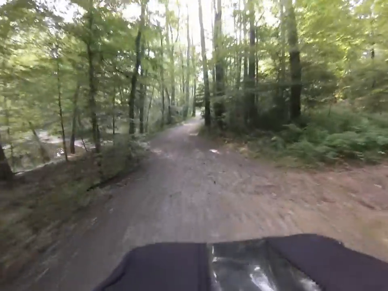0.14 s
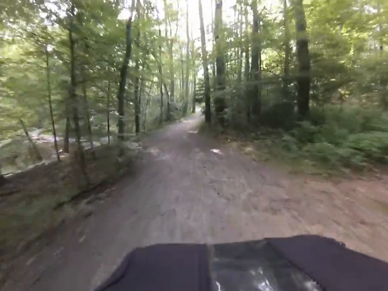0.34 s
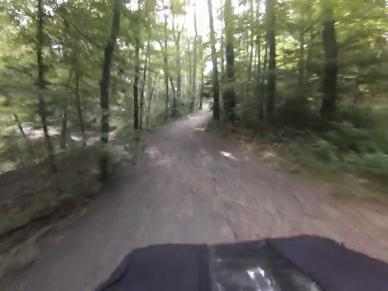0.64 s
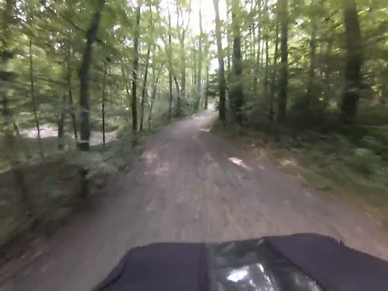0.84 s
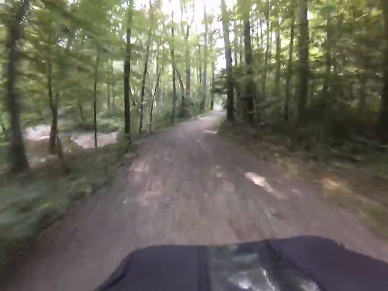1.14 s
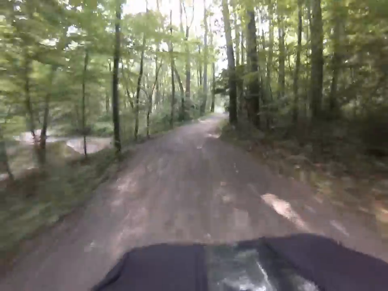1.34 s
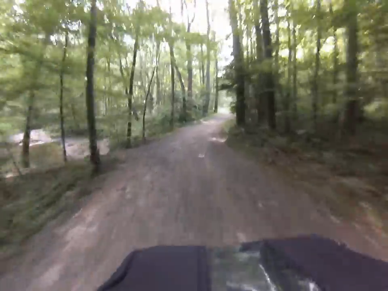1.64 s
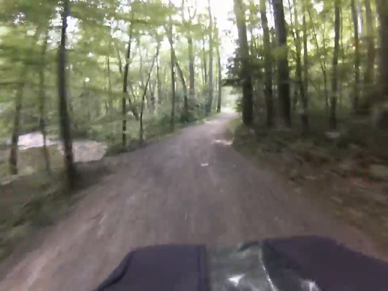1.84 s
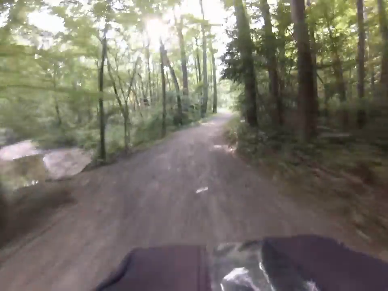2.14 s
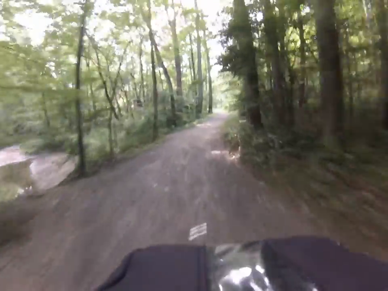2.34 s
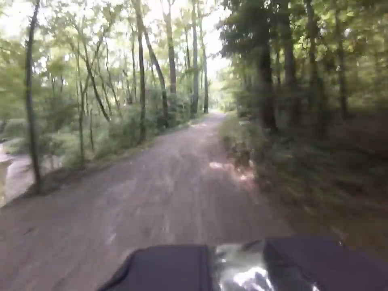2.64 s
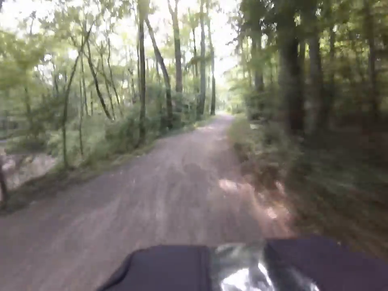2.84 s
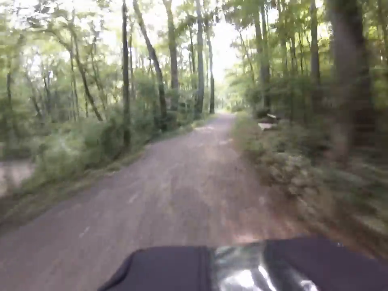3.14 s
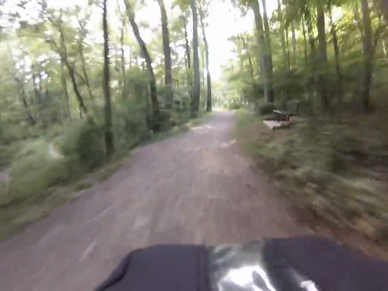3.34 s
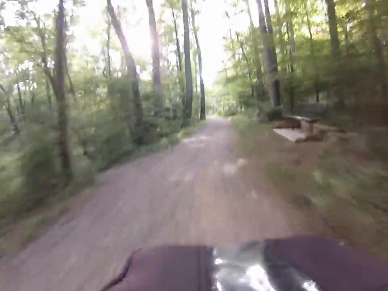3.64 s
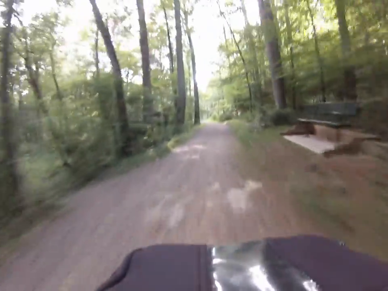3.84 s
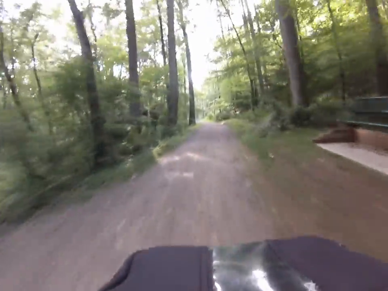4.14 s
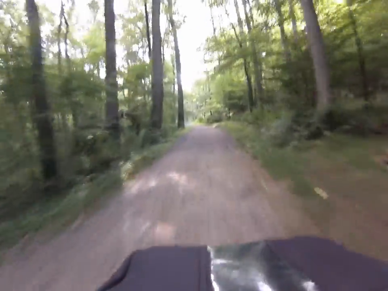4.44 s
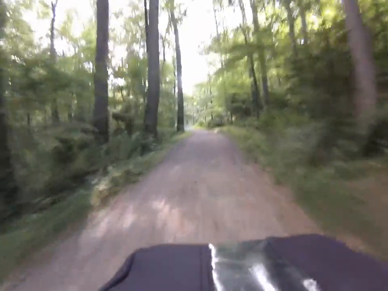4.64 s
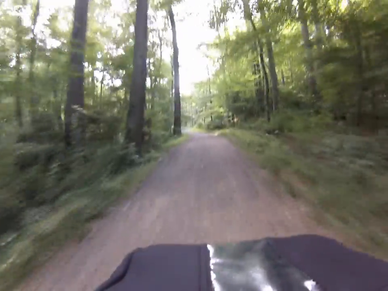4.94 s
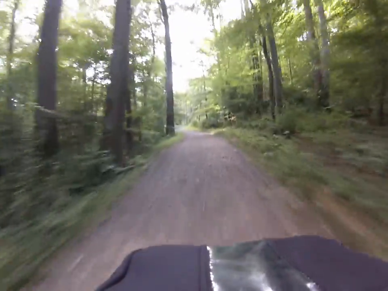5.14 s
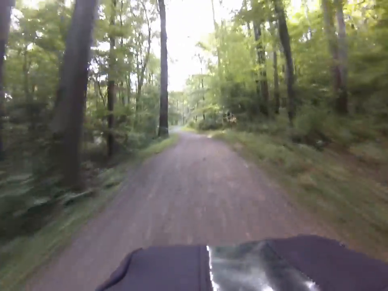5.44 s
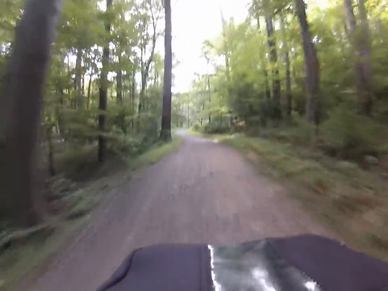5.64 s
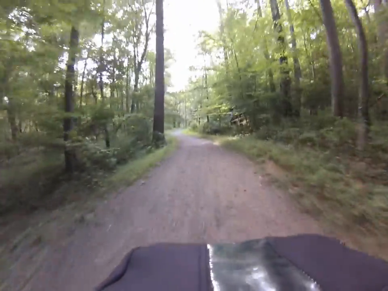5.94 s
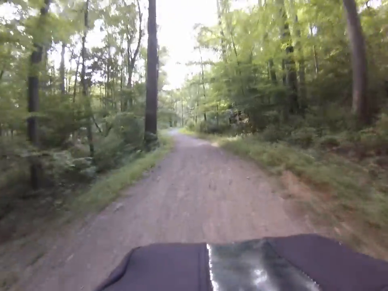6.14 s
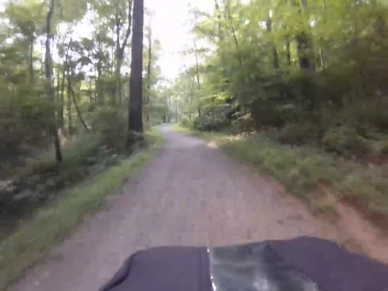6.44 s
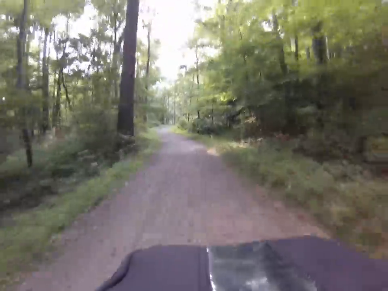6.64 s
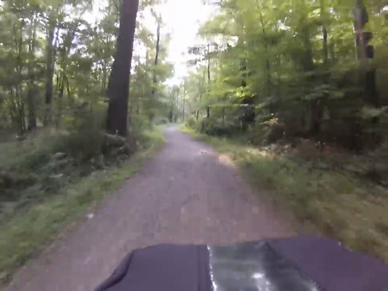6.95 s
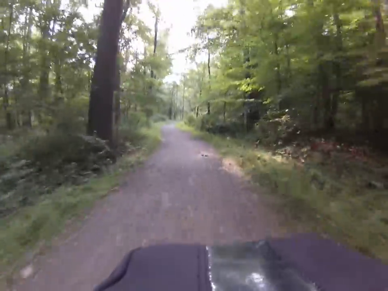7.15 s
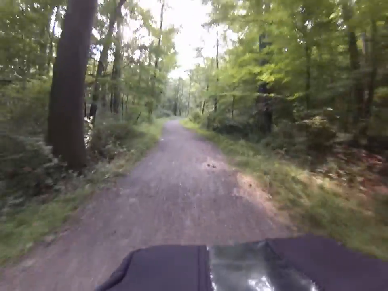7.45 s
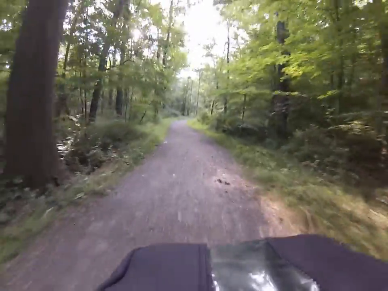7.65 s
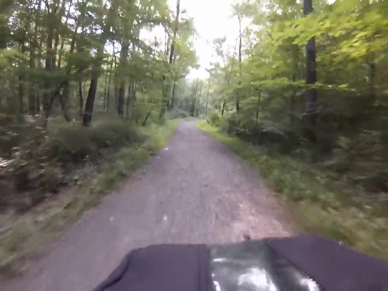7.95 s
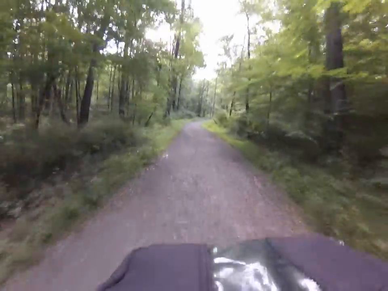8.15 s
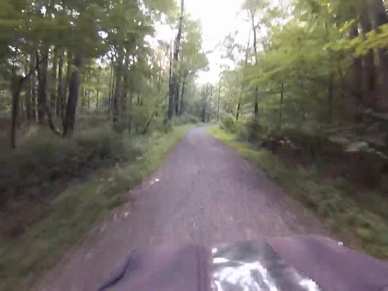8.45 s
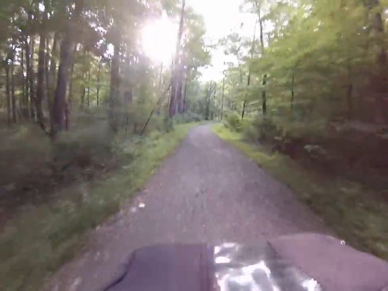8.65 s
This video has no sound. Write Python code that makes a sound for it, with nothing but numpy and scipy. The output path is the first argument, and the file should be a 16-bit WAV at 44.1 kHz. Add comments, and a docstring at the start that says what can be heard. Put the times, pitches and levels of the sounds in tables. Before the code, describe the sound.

A bicycle rolls over a gravel woodland trail for about nine seconds, heard through the closed housing of a camera clamped to it. A muffled tyre rumble runs throughout, with a lighter gravel crunch, irregular clicks of stones hitting the bike and low wind buffeting on the microphone. The first second is a little calmer. From about 1.4 seconds the clamp's low, wavering buzz swells on each bump and it begins to strike its stop with dull thuds and sharp ticks. This rattling is densest from about 2.5 to 5 seconds, with more hard knocks near 5.6 and from 6.7 to 7 seconds, then scattered ones until 8.5. The hardest hits briefly dip the overall level. Faint high ticks and the thin tinkle of a loose steel part sit behind it all. At about 5.3 seconds a bird gives two very faint, high chirps.

```python
"""A camera clamp swings near 70 Hz on a bicycle rolling over a gravel trail; wide swings strike a stop
with a thud and a tick. The tyres rumble through the frame into the camera's closed housing, gravel
crunches and stones click on the bicycle. Behind them tiny ticks prick the treble, a loose steel part
tinkles, a bird chirps twice and wind buffets the microphone port. High peaks briefly duck the gain."""
import sys
import numpy as np
from scipy import signal
from scipy.fft import rfft, irfft, next_fast_len
from scipy.io import wavfile
from scipy.ndimage import uniform_filter1d, map_coordinates

SR = 44100
rng = np.random.default_rng(int(sys.argv[2]) if len(sys.argv) > 2 else 0)


def unload_wav(signal):
    """Save mono or channel-first audio to the path in sys.argv[1] as 16-bit WAV at rate SR, clipped to [-1, 1]."""
    wavfile.write(
        sys.argv[1],
        SR,
        np.round(np.clip(np.atleast_2d(signal).T, -1, 1) * 32767).astype(np.int16),
    )


N = 387198

# Roughness of the trail, as the level of the rumble above its deep part: time_s, level_db
ROUGHNESS = [(0.0, -42), (0.07, -31.5), (0.09, -40.5), (0.29, -33.5), (0.34, -29), (0.37, -33), (0.64, -38),
             (0.68, -29), (0.8, -33.5), (1.35, -28), (2.71, -29), (2.74, -26.5), (2.79, -32.5), (2.88, -24),
             (2.98, -30.5), (3.06, -24.5), (3.08, -29.5), (3.15, -22.5), (3.2, -31), (3.42, -25),
             (4.04, -30.5), (4.81, -28), (4.84, -20.5), (4.89, -29.5), (5.23, -33.5), (5.52, -29),
             (5.57, -25), (5.6, -32), (5.7, -27.5), (6.41, -31), (6.5, -25), (6.55, -33), (6.73, -26),
             (6.8, -37), (6.92, -25.5), (6.97, -32.5), (7.21, -28), (7.24, -34), (7.85, -28), (8.78, -28)]
USUAL_RUMBLE_DB = -29.5


def amp(db):
    """Amplitude ratio of a level in decibels."""
    return 10 ** (np.asarray(db) / 20)


def unit(x):
    """Normalisation to an rms of 1."""
    return x / np.sqrt(np.mean(x ** 2) + 1e-20)


def curves(rows):
    """Linear interpolation: one value per sample for each column after the time."""
    time_s, *columns = np.transpose(rows)
    return [np.interp(np.arange(N) / SR, time_s, column) for column in columns]


def wobble(rate):
    """Slow random modulation: a spline through `rate` knots a second."""
    knots = rng.standard_normal(int(N * rate / SR) + 4)
    return map_coordinates(knots, [np.arange(N) * rate / SR])


def filtered(x, response):
    """Linear filtering: the spectrum times a complex frequency response."""
    size = next_fast_len(N + SR // 2)
    return irfft(rfft(x, size) * response(np.fft.rfftfreq(size, 1 / SR)), size)[:N]


def coloured(x, spectrum):
    """Spectral shaping by (frequency_hz, level_db) points on a log axis, to an rms of 1."""
    hz, db = np.transpose(spectrum)
    return unit(filtered(x, lambda f: amp(np.interp(np.log(f + 1), np.log(hz), db, -120, -120))))


def resonate(x, modes):
    """Modal superposition: x drives damped resonances of alternating sign."""
    return filtered(x, lambda f: sum(
        (-1) ** k * amp(db) * 1j * f * width / (hz * hz - f * f + 1j * f * width)
        for k, (hz, width, db) in enumerate(modes)))


def muffled(x, top_hz):
    """Low-pass filtering: soft contacts carry no treble."""
    return signal.sosfilt(signal.butter(4, top_hz, fs=SR, output="sos"), x)


def patchy(x, depth_db):
    """Random amplitude modulation in patches of time and frequency."""
    spectra = signal.stft(x, nperseg=1024)[2]
    field = uniform_filter1d(uniform_filter1d(rng.standard_normal(spectra.shape), 3, 0), 4, 1)
    return signal.istft(spectra * amp(depth_db * unit(field)), nperseg=1024)[1][:N]


def blows(times, db):
    """Impulse excitation: one sharp push at each time."""
    return np.bincount(np.round(np.asarray(times) * SR).astype(int), amp(db), N + SR)[:N]


def bursts(times, db, t60):
    """Noise excitation: an exponentially decaying puff at each time; db sets its energy."""
    t = np.arange(max(1024, round(t60 * SR) // 2)) / SR
    puffs = amp(-60 * t / t60) * rng.standard_normal((len(times), len(t)))
    puffs *= (amp(db) / np.linalg.norm(puffs, axis=1))[:, None]
    samples = np.round(np.asarray(times) * SR).astype(int)[:, None] + np.arange(len(t))
    return np.bincount(samples.ravel(), puffs.ravel(), N + SR)[:N]


def grainy(rate, spread_db, t60):
    """A Poisson process of contacts: noise jumps at each and decays after it; rms 1."""
    contacts = rng.random(N) < rate / SR
    strength = amp(spread_db * np.minimum(rng.exponential(size=N), 4.5))  # stones have a largest size
    envelope = signal.lfilter([1], [1, -amp(-60 / (t60 * SR))], contacts * strength)
    return unit(envelope * rng.standard_normal(N))


def swing_state():
    """Level (dB) and pitch (Hz) of the clamp, a softening oscillator: bumps widen and slow its swing."""
    # Bumps in the trail: centre_s, added_swing_db, length_s
    bumps = [(0.41, -36, 0.26), (0.564, -25, 0.12), (0.797, -33, 0.57), (1.068, -27, 0.16),
             (1.213, -29, 0.32), (1.408, -24.5, 0.16), (1.571, -27, 0.15), (1.738, -21, 0.35),
             (1.953, -22, 0.25), (2.09, -31, 0.87), (2.425, -22, 0.38), (2.673, -19.5, 0.26),
             (2.891, -19, 0.36), (3.164, -21, 0.5), (3.36, -20, 0.13), (3.522, -20, 0.31),
             (3.733, -17.5, 0.19), (3.913, -21, 0.28), (4.105, -26, 0.25), (4.217, -35, 0.087),
             (4.343, -19, 0.32), (4.514, -19.5, 0.11), (4.749, -18, 0.56), (5.019, -17.5, 0.17),
             (5.119, -20.5, 0.084), (5.473, -21.5, 0.77), (5.818, -26, 0.57), (6.04, -23.5, 0.23),
             (6.211, -21, 0.17), (6.316, -25, 0.1), (6.499, -20, 0.25), (6.699, -19.5, 0.33),
             (6.907, -18.5, 0.26), (7.089, -22, 0.18), (7.364, -29, 0.48), (7.512, -24.5, 0.45),
             (7.746, -25.5, 0.18), (7.867, -22.5, 0.2), (7.98, -20, 0.095), (8.208, -22, 0.42),
             (8.522, -24.5, 0.33), (8.722, -22.5, 0.22)]
    calm_db, rest_hz, sag_hz_per_width = -32, 77.63, 57.82
    t = np.linspace(0, N / SR, num=4000)
    swells = sum(amp(db) * np.cos(np.pi * np.clip((t - centre_s) / length_s, -.5, .5)) ** 2
                 for centre_s, db, length_s in bumps)
    width, = curves(np.c_[t, amp(calm_db) + swells])
    return 20 * np.log10(width), rest_hz - sag_hz_per_width * width


def wind():
    """Turbulent pressure buffets the microphone port in low lumps."""
    # Strength of the gusts: time_s, level_db
    gusts = [(0, -28), (.6, -30.5), (1.6, -25), (5.2, -27.5), (8.78, -24.5)]
    # Spectrum of the buffeting: frequency_hz, density_db
    buffet = [(8, -24.5), (20, 3), (35, -12), (55, 3.5), (110, -10), (200, -37)]
    return amp(curves(gusts)[0] + 1.4 * wobble(2.0)) * coloured(rng.standard_normal(N), buffet)


def bird():
    """Two thin notes glide up and droop; reverberation among the trees smears them."""
    # Contour of each note: time_s, pitch_hz, level_db
    notes = [
        [(5.272, 7830, -66), (5.29, 8630, -66), (5.312, 8000, -72)],
        [(5.325, 7300, -60), (5.345, 8230, -66), (5.375, 8000, -72)],
    ]
    song = np.zeros(N)
    for note in notes:
        hz, db = curves(note)
        start, end = round(note[0][0] * SR), round(note[-1][0] * SR)
        tone = amp(db) * np.sin(2 * np.pi * np.cumsum(hz) / SR)
        song[start:end] = tone[start:end] * signal.windows.tukey(end - start, .3)
    reverb_t60, reverb_db = 0.16, 7
    tail = rng.standard_normal(SR // 5) * amp(-60 * np.arange(SR // 5) / SR / reverb_t60)
    return song + amp(reverb_db) * signal.fftconvolve(song, tail / np.linalg.norm(tail))[:N]


def tinkle():
    """Lightly damped modes of a loose steel part jingle, each in its own spells, and ring when jolted."""
    # Modes of the steel: pitch_hz, width_hz, jolt_gain_db
    steel_modes = [(6490, 57, -2), (10030, 110, -17), (14140, 50, -18)]
    # Jingling drive of each mode: time_s, low_db, middle_db, high_db
    jingle = [(0, -59, -59, -68), (1.1, -58, -70, -70), (1.3, -61, -59, -72), (3.4, -50, -59, -63),
              (3.7, -56, -69, -68), (4.4, -48, -66, -72), (5.3, -57, -69, -71.5), (8.78, -57, -67, -77)]
    # Jolts to the part: start_s, level_db
    jolt_events = [(1.327, -1), (1.4431, -3), (2.593, -5), (3.02, -5), (3.068, -9), (3.22, -3),
                   (4.1649, -4), (4.31, -3), (4.345, -1), (4.3994, -6), (4.55, -9), (6.0566, -3),
                   (6.692, -0.5)]
    jolts = bursts(*np.transpose(jolt_events), t60=0.18)
    ringing = np.zeros(N)
    for (hz, width, jolt_db), drive_db in zip(steel_modes, curves(jingle)):
        rattle = amp(drive_db + 2.8 * wobble(14)) * grainy(250, spread_db=-1.0, t60=.05)
        ringing += resonate(amp(jolt_db) * jolts + rattle, [(hz, width, 0)])
    return ringing


def tiny_ticks():
    """Brief bursts excite high resonances: ticks with nothing but treble."""
    # Thin high ticks: time_s, level_db
    ticks = [(1.3765, -30), (1.9708, -29), (2.0433, -25), (2.4167, -26.5), (2.8319, -27), (3.0105, -29),
             (3.33, -29), (3.4517, -27), (4.293, -28), (4.654, -33), (4.9637, -27), (5.0045, -29),
             (5.0461, -25.5), (5.7726, -30), (7.8204, -23.5), (7.845, -27), (8.181, -29.5), (8.747, -24)]
    # Their modes: pitch_hz, width_hz, gain_db
    modes = [(8600, 1200, 5.5), (13200, 1500, -16)]
    time_s, db = np.transpose(ticks)
    return resonate(bursts(time_s - .001, db, t60=.006), modes)


def stones():
    """Impacts of stones: each click has a dull body and a bright edge; hard ones knock the housing."""
    # Loudest stones: time_s, click_db, treble_over_click_db, knock_db
    loud_stones = [(.198, -8, -19, -14), (.2397, -6.5, -20, 14), (.2937, -9, -21, 6), (.318, -7.5, -19, 5),
                   (.3316, -4.5, -23, 21), (.4028, -12, -30, 1), (.4667, -10, -34, 9), (.672, -15, -29, 15),
                   (.8672, -8, -32, 10), (.985, -10, -22, 16), (1.1544, -11, -20, 17),
                   (1.3255, -14, -20, 12), (1.4142, -11, -38, 19), (1.594, -13.5, -14, 18),
                   (1.8664, -8, -33, 15), (1.9697, -9, -27, -2), (2.2775, -8.5, -23, 5),
                   (2.354, -12.5, -26, 3), (2.4157, -11.5, -19, 3), (3.0456, -7, -33, 18),
                   (3.1003, -1, -24, 18), (3.327, -14, -29, 7.5), (3.3839, -6, -16, 15.5),
                   (3.405, -13, -24, 22), (3.4332, -14.5, -19, 16), (3.7801, -8.5, -26, 16),
                   (4.5697, -8, -33, 2), (4.6064, -7, -27, 3), (5.3971, -7, -21, -8.5),
                   (5.4818, -1, -32, -5), (5.4943, -5.5, -23, -5.5), (5.5301, -6.5, -13, 8),
                   (5.557, -4, -20, 22), (5.753, -5, -32, 15), (5.8543, -4.5, -31, -5.5),
                   (6.006, -14, -21, 13), (6.147, -5, -22, 14), (6.3822, -5.5, -41, 12),
                   (6.638, -15, -35, 11), (6.864, -16, -12, 2), (7.017, -8, -25, 3),
                   (7.1758, -18.5, -4.5, 19.5), (7.7763, -7, -28, 4), (7.8275, -3.5, -17, 17),
                   (7.8426, -10, -15, 11.5), (7.913, -15, -13, 8), (8.06, -13, -29, 10),
                   (8.251, -12, -22, -3), (8.3685, -6, -36, 4), (8.6685, -13, -26, 7),
                   (8.686, -11, -15, 18)]
    # Modes of the housing: pitch_hz, width_hz, gain_db
    housing_modes = [(717, 74, 7.5), (958, 265, 0)]
    # Eighty small stones fly at random times; same columns.
    largest_db, scatter_db = (-16, -21.5, -2.5), (6, 11.5, 5)
    chance = rng.random((80, 4))
    small_stones = np.c_[chance[:, 0] * N / SR, largest_db - scatter_db * chance[:, 1:]]
    time_s, click_db, treble_db, knock_db = np.vstack([loud_stones, small_stones]).T
    body_modes = [(1530, 510, 8.5), (2330, 1030, 7), (3620, 1180, -0.5)]
    edge_modes = [(4800, 820, 12.0), (9000, 5000, -23.0)]
    body = resonate(bursts(time_s, click_db, t60=0.018), body_modes)
    edge = resonate(bursts(time_s, click_db + treble_db, t60=0.0045), edge_modes)
    knock = resonate(blows(np.abs(time_s - .0015), knock_db), housing_modes)
    return muffled(body, top_hz=5970) + edge + muffled(knock, top_hz=1500)


def gravel():
    """Granular noise: dense cracks of every stone size, in clumps, over a thin hiss."""
    # Bands in which small to tiny stones crack: centre_hz, width_hz, gain_db
    pebble_bands = [(2000, 1800, 0.5), (3400, 4300, 3), (8600, 8400, -4.5)]
    # Spectrum of the crunch: frequency_hz, density_db
    crunch_spectrum = [(820, -20), (1400, -1.5), (1520, 2), (1890, -7), (2460, -7.5), (2890, -11),
                       (3360, -10), (4400, -19), (13300, -33), (14400, -30.5), (15500, -55)]
    clumps = amp(0.13 * (swing_state()[0] + 22) + 1.7 * wobble(9.6) + 2.7 * wobble(24))
    shared_grains = grainy(200, spread_db=4.0, t60=0.011)
    cracks = sum(resonate(0.7 * shared_grains + grainy(400, spread_db=5.0, t60=0.019), [band])
                 for band in pebble_bands)
    hiss = .8 * rng.standard_normal(N)
    # The crunch lies under the rumble and follows part of each change in it.
    level_db = USUAL_RUMBLE_DB - 15.5 + 0.57 * (curves(ROUGHNESS)[0] - USUAL_RUMBLE_DB)
    return amp(level_db) * coloured(unit(clumps * cracks) + hiss, crunch_spectrum)


def tyres():
    """Structure-borne sound: tyres rumble through the frame; bumps swell the deep part most."""
    # Spectrum of the rumble through the frame: frequency_hz, density_db
    frame_spectrum = [(59, -43), (100, -7.5), (129, -11.5), (166, -13), (228, -5.5), (280, -11), (339, -6),
                      (531, -7.5), (606, -14), (830, -14), (1040, -16.5), (1270, -37.5), (1800, -42.5),
                      (2340, -76), (3960, -120)]
    rumble_db, = curves(ROUGHNESS)
    bump_db = swing_state()[0] + 22
    lumps = grainy(500, spread_db=3.0, t60=0.023) + 1.06 * rng.standard_normal(N)
    rumble = coloured(patchy(lumps, depth_db=1.95), frame_spectrum)
    deep = filtered(rumble, lambda hz: 1 / (1 + (hz / 560) ** 8))
    upper = rumble - deep
    # The deep part ignores 45% of each change in roughness.
    deep_db = -4.5 - 0.45 * (rumble_db - USUAL_RUMBLE_DB) + 0.71 * bump_db
    level_db = rumble_db + 0.024 * bump_db + 0.63 * wobble(6.5)
    return amp(level_db) * (upper + amp(deep_db) * deep) / np.std(upper)


def clamp():
    """An impact oscillator: the clamp swings, and each wide cycle meets the stop with a thud and a tick."""
    # Hardest contacts with the stop: time_s, tick_db, thud_db
    contacts = [(1.418, -23, 21), (1.703, -21, 16), (1.8756, -17, 21), (1.9455, -3, 21.5),
                (2.002, -14, 19.5), (2.0541, -14, 21), (2.402, -20, 19), (2.4165, -18, 15.5),
                (2.4292, -4, 22), (2.6506, -5.5, 21), (2.6626, -20, 12), (2.7377, 0, 24.5),
                (2.7516, -21, 20), (2.765, -6.5, -2), (2.8305, -5, 18), (2.8463, 1.5, 4), (2.8586, -13, 23),
                (2.8726, -11, 23), (2.887, -18, 20), (2.918, -4.5, 20), (2.9579, -18, 19), (3.01, -7, 16),
                (3.023, 5, 23), (3.0379, -17, 24.5), (3.0563, -22, 24.5), (3.1062, -3, 19.5),
                (3.1573, 7, 23.5), (3.1734, -20, 22), (3.293, 0, 26.5), (3.4927, 1.5, 18), (3.5064, 1, 26),
                (3.5344, -8, 25), (3.549, -13, 23.5), (3.7023, -2, 23.5), (3.718, 1, 19), (3.745, -6, 18),
                (3.759, -17, 23), (3.875, -3, 6.5), (3.9975, -23, 18.5), (4.1142, 0, 16),
                (4.138, -5.5, 21.5), (4.2807, -14, 19.5), (4.3609, 1, 11), (4.4815, 1.5, 6),
                (4.496, -22, 25), (4.523, -4.5, 22), (4.637, -1, 9), (4.654, 1, 24), (4.681, -1, 21.5),
                (4.6944, -1, 26.5), (4.7099, -10, 22), (4.738, 1, 1), (4.7511, -1, 25.5), (4.766, -2, 21),
                (4.7788, -20, 21), (4.8082, 0, 11), (4.823, -2, 23), (4.8365, -3, 21), (4.8496, -18, 15),
                (4.989, -15, 19), (5.018, -1, 5), (5.033, -5, 15), (5.0449, -2.5, 18.5),
                (5.0705, -17, 17.5), (5.3727, -14, 19), (5.5236, -17, 15), (5.5513, 8, 21),
                (5.5667, 1.5, 31), (5.637, 1, 14), (5.6515, -5, 23), (5.6642, -20, 22.5), (5.7052, -15, 24),
                (5.7971, -29, 22.5), (5.8443, -5, -4), (6.2217, -3, 19), (6.2378, -22, 21),
                (6.6777, -4.5, 7.5), (6.692, 2, 11), (6.707, -7, 27), (6.721, -1.5, 18), (6.736, -1, 33),
                (6.9073, 3, 19), (6.9225, -2, 26), (6.9363, -7, 20), (6.9502, -25, 19), (6.974, -2, 19),
                (7.0914, -9, 16), (7.437, -19, 20.5), (7.548, -7, 18.5), (7.7473, -6, 20.5),
                (7.8824, -12, 20.5), (7.972, -15, 19.5), (8.2215, -5, 21), (8.533, 2.5, 21)]
    # Thud modes of the shell: pitch_hz, width_hz, gain_db
    shell_modes = [(219, 130, 1), (302, 25, 6), (339.5, 39, 5), (493, 95, 9.5), (940, 370, -4.5)]
    # Tick modes, passed twice (stop and clamp arm): pitch_hz, width_hz, gain_per_pass_db
    stop_modes = [(2230, 294, 1), (3510, 440, -0.36), (4700, 860, -3.5), (8950, 1700, -10),
                  (13500, 2400, -18)]
    contact_s, tick_db, thud_db = np.transpose(contacts)
    swing_db, swing_hz = swing_state()
    turns = np.cumsum(swing_hz + 2 * wobble(20)) / SR
    at_contact = turns[(contact_s * SR).astype(int)]
    slip = np.unwrap(at_contact - np.round(at_contact), period=1)
    turns -= np.interp(np.arange(N) / SR, contact_s, slip)  # each hard contact falls on a whole turn
    phase = 2 * np.pi * (turns - .4)
    level_db = swing_db + 1.32 * wobble(30)
    past_gap_db = np.minimum(level_db + 18.5, 1.5)
    overtone = amp(-13.0 + 2.6 * past_gap_db) * np.cos(2 * phase - .7)  # the stop bends wide swings
    swing = np.sqrt(2) * amp(level_db) * (np.cos(phase) + overtone)

    bottoms = np.flatnonzero(np.diff(np.floor(turns + .17)) > 0)
    reach_db = past_gap_db[bottoms] + 0.37 * rng.standard_normal(len(bottoms))
    thuds = resonate(bursts(bottoms / SR, 5 + 3.6 * reach_db, t60=0.02), shell_modes)
    widening = 1.2  # a hard contact damps the shell
    damped_modes = [(hz, widening * width, db) for hz, width, db in shell_modes]
    thuds -= resonate(blows(contact_s - .0024, thud_db), damped_modes) / widening

    hard_ticks = bursts(contact_s + .0005, tick_db - 8, t60=.006) + blows(contact_s + .0006, tick_db)
    light_ticks = bursts(bottoms / SR + .0017, -27 + 3.2 * reach_db, t60=.006)
    ticks = resonate(resonate(hard_ticks + light_ticks, stop_modes), stop_modes)
    return swing + muffled(thuds, top_hz=1024) + ticks


def scene():
    """Superposition of all sources in one channel."""
    return (clamp() + tyres() + gravel() + stones() + tiny_ticks() + tinkle() + bird() + wind())[None]


def record(dry):
    """Automatic gain control ducks after high peaks and recovers; soft clipping and a band limit follow."""
    threshold, duck_db, recovery_db_per_s, attack_s, top_hz = .86, 5, 45, .018, 15620
    climb_db = recovery_db_per_s * np.arange(N) / SR
    trip_db = duck_db * np.clip((np.abs(dry[0]) - threshold) / .1, 0, 1)
    drop_db = np.maximum.accumulate(trip_db + climb_db) - climb_db
    lag = round(attack_s * SR)
    ducked = dry[0] * amp(-uniform_filter1d(np.pad(drop_db, (lag, 0))[:N], lag))
    rounded = ducked / (1 + np.abs(ducked) ** 8) ** (1 / 8)
    return filtered(rounded, lambda hz: hz < top_hz)[None]


dry = scene()
out = record(dry)
unload_wav(out)
```